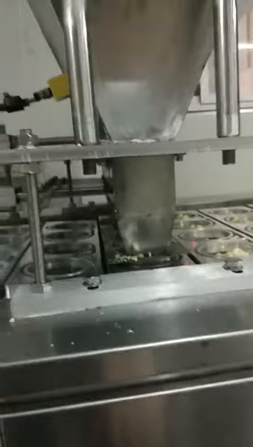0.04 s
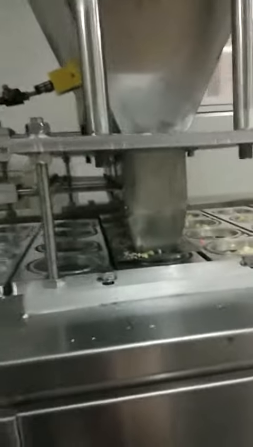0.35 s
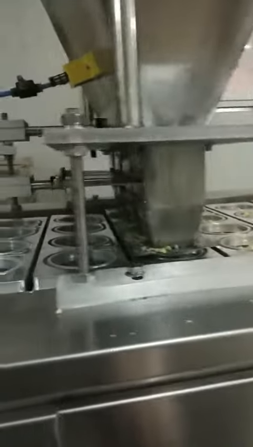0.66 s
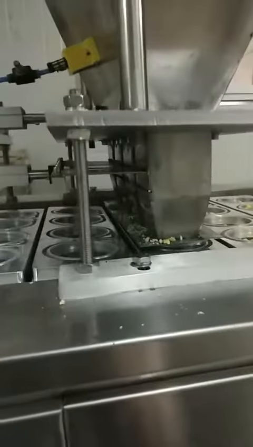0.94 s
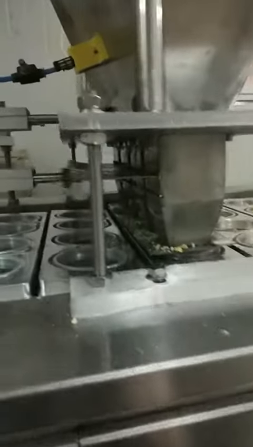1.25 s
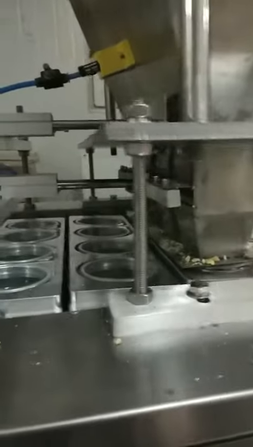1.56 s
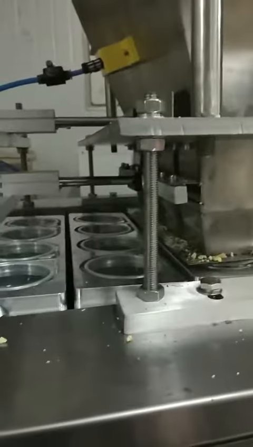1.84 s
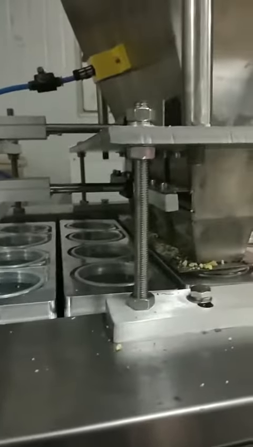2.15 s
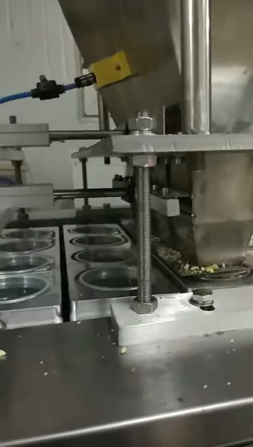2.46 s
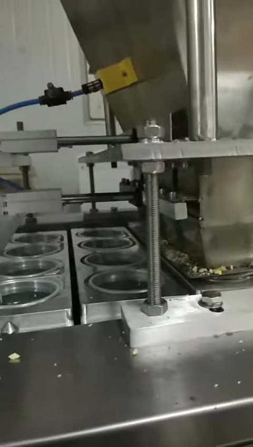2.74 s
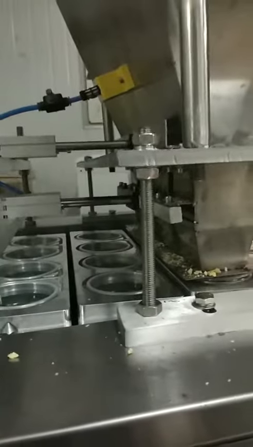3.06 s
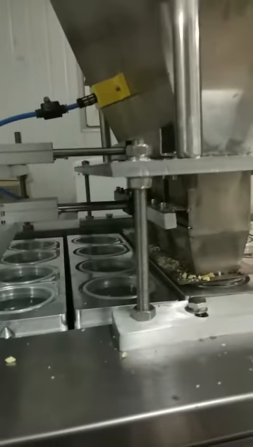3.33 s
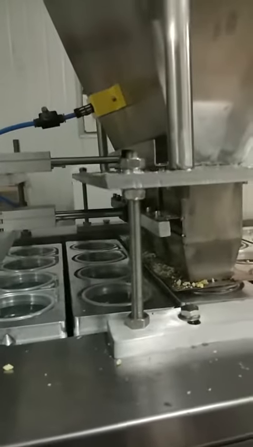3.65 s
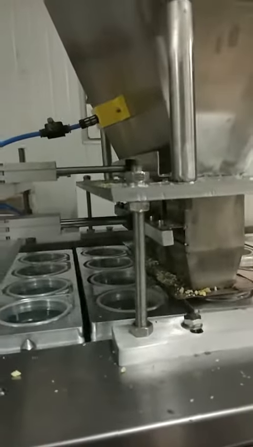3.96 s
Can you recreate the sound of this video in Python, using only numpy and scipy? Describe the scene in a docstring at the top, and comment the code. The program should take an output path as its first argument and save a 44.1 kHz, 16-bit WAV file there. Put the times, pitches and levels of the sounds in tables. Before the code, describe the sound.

A vibrating factory machine clunks to a stop, then air squeaks and hisses over machine noise.

```python
"""The vibrating steel hopper of a cup filling machine drones and rattles close by, with food fizzing inside.
It stops: a valve lets out air, a cylinder clanks against its stop and the dosing gate clunks. Slides
swish, air squeaks and hisses out of the cylinders, and the hopper begins to shake again.
Behind it all, a room full of machines roars and hums."""
import sys
import numpy as np
from scipy import signal
from scipy.fft import rfft, irfft
from scipy.io import wavfile
from scipy.ndimage import uniform_filter1d

SR = 44100
rng = np.random.default_rng(int(sys.argv[2]) if len(sys.argv) > 2 else 0)


def dump(signal):
    """Clip the signal to [-1, 1] and save it as 16-bit WAV at the path in sys.argv[1]."""
    limited = np.clip(np.atleast_2d(signal).T, -1, 1)
    pcm = np.round(limited * 32767).astype(np.int16)
    wavfile.write(sys.argv[1], SR, pcm)


N = 176400
TIME = np.arange(N) / SR
HZ = np.fft.rfftfreq(N, 1 / SR)
TOP_HZ = 15780


def amp(db):
    """Turns decibels into a gain."""
    return 10 ** (np.asarray(db) / 20)


def unit(x):
    """Scales a signal to an average (rms) level of 1."""
    return x / np.sqrt(np.mean(x ** 2) + 1e-20)


def over_pitch(points):
    """Joins (f/Hz, value) points into a curve over all frequencies."""
    hz, value = np.transpose(points)
    return np.interp(np.log(HZ + 1), np.log(hz + 1), value)


def over_time(points):
    """Joins (t/s, value) points into a curve over all samples."""
    return np.interp(TIME, *np.transpose(points))


def pan(db):
    """Left and right gains, with the left louder by db."""
    return amp(np.array([[db], [-db]]) / 2)


def drift(hz):
    """A smooth random wobble, mostly slower than hz."""
    return unit(irfft(rfft(rng.standard_normal(N)) * np.exp(-(HZ / hz) ** 2), N))


def noise(spectrum):
    """Stereo noise with this tone shape: alike on both sides in the bass, leaning left in the treble."""
    # how alike the two sides are: f/Hz, likeness/0-1
    likeness = [(100, 1), (280, 0.8572), (600, 0.6919), (1100, 0), (3000, 0), (16000, 0.0108)]
    # how much louder the left is: f/Hz, level/dB
    balance = [(60, -3.5), (150, 1), (380, 0.5), (950, 1.5), (2380, 6), (5980, 4.5), (15000, 9)]
    left, other = rfft(rng.standard_normal((2, N)))
    same, lean = np.clip(over_pitch(likeness), -1, 1), amp(over_pitch(balance) / 2)
    right = same * left + np.sqrt(1 - same ** 2) * other
    x = irfft(np.array([left * lean, right / lean]) * amp(over_pitch(spectrum)), N)
    return x / x.mean(0).std()


def ring_body(x, spectrum):
    """Plays x through a body with this tone shape, which rings only after each push."""
    log_gain = np.log(amp(over_pitch(spectrum)))
    response = np.exp(np.conj(signal.hilbert(np.r_[log_gain, log_gain[-2:0:-1]])))
    return signal.fftconvolve(x, irfft(response[:len(HZ)], N)[:4096])[:N]


def resonate(x, hz, width_hz):
    """Keeps a narrow band around a pitch, which may glide."""
    turn = np.exp(2j * np.pi * np.cumsum(hz * np.ones(len(x))) / SR)
    decay = np.exp(-np.pi * width_hz / SR)
    return 2 * (turn * signal.lfilter([1 - decay], [1, -decay], x / turn)).real


def swells(rows):
    """Loudness of events that rise, then drop 60 dB in their fade time (a negative fade grows)."""
    power = 0
    for start, rise, fade, db in rows:
        onset = np.clip((TIME - start) / rise, 0, 1)
        power += (onset * amp(db - 60 * np.maximum(TIME - start - rise, 0) / fade)) ** 2
    return np.sqrt(power)


def echoes(x, fade_s):
    """Dense echoes, different on each side, that drop 60 dB in fade_s."""
    t = TIME[:SR // 2]
    tail = rng.standard_normal((2, len(t))) * amp(-60 * t / fade_s)
    return signal.fftconvolve(np.atleast_2d(x), tail / np.linalg.norm(tail[0]), axes=1)[:, :N]


def add(mix, start, sound):
    """Mixes a sound in, start seconds from the beginning."""
    part = mix[round(start * SR):][:len(sound)]
    part += sound[:len(part)]


def left_first(x, lag_s):
    """A sound that reaches the left side before the right."""
    return np.array([x, irfft(rfft(x) * np.exp(-2j * np.pi * HZ * lag_s), N)])


def sputter(x, db, hz, seconds):
    """Turbulence: patches of the sound, sized by hz and seconds, flare and sink at random."""
    spectra = signal.stft(x, nperseg=1024, noverlap=768)[2]
    patches = rng.standard_normal(spectra.shape[1:])
    for axis, width in enumerate([hz * 1024 / SR, seconds * SR / 256]):
        n = patches.shape[axis]
        blur = np.exp(-(2 * np.fft.rfftfreq(n) * width) ** 2)
        patches = irfft(rfft(patches, axis=axis) * np.expand_dims(blur, 1 - axis), n, axis=axis)
    return signal.istft(spectra * unit(amp(db * unit(patches))), nperseg=1024, noverlap=768)[1][:, :N]


def machine_room():
    """The other machines roar steadily, with a wavering motor hum."""
    # tone shape of the roar: f/Hz, level/dB
    roar_tone = [(25, -54.5), (95, -35), (125, -18), (170, -8), (235, -3.5), (300, -6), (380, -11.5),
                 (470, -10), (640, -12.5), (820, -13), (1050, -15.5), (1600, -16.5), (2200, -12),
                 (2700, -13), (3400, -22), (6400, -26.5), (10000, -27), (12500, -33.5), (16000, -37.5)]
    # motor notes: f/Hz, width/Hz, level/dB
    motor_notes = [(248.58, 14.31, -43), (329.97, 4.904, -51.5)]
    hum = 0
    for hz, width, db in motor_notes:
        band = resonate(rng.standard_normal(N), hz, width)
        hum += amp(db) * unit(resonate(band, hz, width))
    return noise(roar_tone) * amp(-33 + .5 * drift(34.76)) + hum


def slides():
    """Running slides swish smoothly and the carriage rumbles."""
    # slide and carriage moves: start/s, rise/s, fade/s, level/dB
    slide_moves = [(.69, 0.01442, 2.5, -26), (1.03, 0.25453, 0.0021, -29.5), (2.2, 0.15584, 0.9851, -30.5),
                   (2.41, 0.0509, 0.522, -33.5), (3.27, 0.1175, 5, -28.5), (3.86, 0.092, -6.5, -35)]
    carriage_moves = [(.64, 0.0359, 0.5496, -27), (1.0, 0.04534, 0.464, -32), (3.33, 0.15996, 1, -30)]
    # their tone shapes: f/Hz, level/dB
    swish_tone = [(60, -48.5), (200, -6), (350, -11), (800, -2), (1600, -5.5), (2300, -2), (3200, -8.5),
                  (5000, -9), (7500, -14), (10500, -11), (13000, -24), (16000, -21.5)]
    rumble_tone = [(60, -56), (150, -18), (220, 5.5), (340, 12.5), (450, 7.5), (700, -9.5), (2000, -38),
                   (16000, -70)]
    travel = uniform_filter1d(swells(slide_moves), round(0.1165 * SR))  # soft starts and stops
    return noise(swish_tone) * travel + noise(rumble_tone) * swells(carriage_moves)


def valves():
    """Valves tick and let out spitting puffs of air."""
    # puffs: start/s, rise/s, fade/s, level/dB
    vents = [(.631, .016, .5, -19), (.76, .1, 2, -38), (1.98, 0.01311, 2.6, -36.5),
             (2.26, 0.0734, 0.557, -34.5), (2.897, 0.01118, 1.72, -36.5)]
    # ticks: t/s, level/dB
    tick_times = [(2.344, -32.5), (2.711, -29.5), (2.901, -29.5), (2.914, -34)]
    # tone shape of both: f/Hz, level/dB
    spit_tone = [(200, -32), (2800, -15), (4800, -3), (5600, 3.5), (6400, -3), (7800, -1.5), (9400, 1.5),
                 (11600, -2), (12800, -9.5), (16000, -8)]
    spit = noise(spit_tone)
    puffs = swells(vents) * amp(1.2 * drift(64.4))
    ticks = swells([(start, .001, 0.01041, db) for start, db in tick_times])
    return sputter(spit * (puffs + ticks) * pan(db=0.5), db=2.2, hz=300.9, seconds=0.06098)


def squeak(start, length, hz, glide, db, overtone_db):
    """Air forced past a seal sings briefly; the wider the gap, the lower and hissier the note."""
    t, out = np.arange(0, length, 1 / SR), np.zeros(N)
    width_hz = 1400 * (6000 / hz) ** 1.6
    arch = np.sqrt(abs(np.sin(np.pi * t / length)))
    for harmonic, level_db in [(1, db), (2, overtone_db), (3, overtone_db - 10)]:
        if harmonic * hz < TOP_HZ:
            band = rng.standard_normal(N)[:len(t)]
            for _ in range(3):
                band = resonate(band, harmonic * (hz + glide * t), width_hz * np.sqrt(harmonic))
            add(out, start, amp(level_db) * unit(band) * arch)
    return out


def exhaust():
    """Air hisses and squeaks out of the cylinders and makes the air line ring."""
    # bursts of air: start/s, rise/s, fade/s, level/dB
    bursts = [(3.07, 0.1376, 0.861, -29), (3.615, 0.06165, 0.7444, -25.5), (3.70, 0.03152, 0.7976, -28.5),
              (3.878, 0.01555, 0.826, -22.5)]
    # their tone shape: f/Hz, level/dB
    hiss_tone = [(200, -28), (3100, -17), (3800, -3), (4500, 4), (5200, 2), (5900, -9), (6700, 6),
                 (9800, 3), (12000, 2), (13500, -1), (16000, -0.5)]
    # squeaking seals: start/s, length/s, f/Hz, glide/(Hz per s), level/dB, overtone level/dB
    seal_notes = [(2.958, 0.02784, 7291, 11999.5, -38, -50.5), (2.998, 0.03676, 6730, 5000, -31, -42),
                  (3.025, 0.05129, 7340, 2000, -26.5, -28.5), (3.07, .06, 6400, 3000, -30, -34),
                  (3.098, .08, 7100, -2000, -25.5, -30), (3.14, .08, 6700, -9000, -25, -24),
                  (3.18, 0.0701, 5700, -11000, -29, -24), (3.22, .1, 5000, -2000, -31, -24),
                  (3.366, 0.03478, 6810, 0, -32.5, -59.5), (3.58, .09, 5254, -1000, -32, -30),
                  (3.645, .09, 4900, -3000, -28, -24), (3.712, 0.0891, 4200, -3000, -31.5, -28),
                  (3.813, 0.062, 8228, -10000, -22.5, -31), (3.88, 0.06557, 4400, -8000, -26, -26.5),
                  (3.939, 0.04974, 4462, -1000, -29, -33)]
    # ringing notes of the air line: f/Hz, level/dB
    line_notes = [(4533, -10.5), (6290, 1), (6880, 7), (7345, 3), (7596, 5), (8272, 4), (10128, 3)]
    squeaks = sum(squeak(*row) for row in seal_notes)
    squeaks = (echoes(squeaks, fade_s=.003) + amp(-2) * echoes(squeaks, fade_s=.16)) * pan(db=5)
    hiss = noise(hiss_tone) * swells(bursts) * amp(.9 * drift(67.8))
    jet = amp(-3.5) * squeaks + hiss
    ringing = [sum(amp(db) * resonate(side, hz, width_hz=45.64) for hz, db in line_notes) for side in jet]
    return amp(-1) * sputter(jet + np.array(ringing), db=4.5, hz=195.97, seconds=0.05502)


def steel_hit(notes, bright_db=0):
    """A struck steel part rings at its own notes, tuned a little differently on each hit."""
    t, out = TIME[:SR // 2], 0
    for hz, db, fade_s in notes:
        level = amp(db + bright_db * (hz > 700) - 60 * t / fade_s)
        out += level * np.cos(2 * np.pi * hz * rng.normal(1, 0.007794) * t)
    return out * np.minimum(t / 0.001243, 1)


def cylinder_and_gate():
    """The cylinder clanks on its stop, then the gate slams and bounces as its latch scrapes."""
    # cylinder hits: t/s, level/dB
    clanks = [(0.7138, 3.5), (0.72, 1), (.729, -0.5), (0.785, -6.5), (.826, -12.5)]
    # gate hits: t/s, level/dB, boost above 700 Hz/dB
    clunks = [(.9795, -11, 19.5), (.9835, -8, 18), (0.9908, -3, -2), (1.0, 4, -0.5), (1.023, -3.5, -11.5),
              (1.043, -12, 6)]
    # ringing notes of each part: f/Hz, level/dB, fade/s
    stop_notes = [(875.04, -29.5, 0.1866), (1012.7, -23.5, 0.1386), (1062.9, -28.5, 0.1157),
                  (1321.9, -28, 0.2), (1426.5, -27.5, 0.2225)]
    gate_notes = [(200.1, -28, 0.3453), (354.7, -23.5, 0.0772), (539.34, -25.5, 0.08765),
                  (575.47, -13.5, 0.04904), (748.16, -51, 0.0503), (899.7, -18.5, 0.0479),
                  (1093.1, -24.5, 0.04008), (1295.2, -35, 0.1118)]
    # latch scrape: start/s, rise/s, fade/s, level/dB
    latch = [(0.979, 0.004877, 0.06446, -20)]
    # tone shape of the cylinder's crack and the scrape: f/Hz, level/dB
    crack_tone = [(200, -20), (700, 7), (1150, 6), (1700, -2.5), (2300, 4.5), (3600, 1.5), (4400, -3),
                  (4950, 2.5), (5700, -5), (11000, -4), (13000, -12), (16000, -17.5)]
    stop, gate = np.zeros((2, N))
    for start, db in clanks:
        add(stop, start, amp(db) * steel_hit(stop_notes))
    for start, db, bright_db in clunks:
        add(gate, start, amp(db) * steel_hit(gate_notes, bright_db))
    cracks = noise(crack_tone) * swells([(start, .001, 0.1094, db - 19.5) for start, db in clanks] + latch)
    hits = (echoes(stop, fade_s=0.00615) + gate) * pan(db=-1.5) + cracks * pan(db=-4)
    hits = signal.sosfilt(signal.butter(2, 256.4, "high", fs=SR, output="sos"), hits)
    return hits + amp(-5.5) * echoes(hits, fade_s=0.7608)


def food_fizz(cycles):
    """Food in the hopper fizzes, pulsing with each shake, then dies away."""
    # tone shape of the fizz: f/Hz, level/dB
    fizz_tone = [(200, -25.5), (700, 5), (1350, -1), (1750, -5), (2400, -5), (3200, -6), (4700, -7),
                 (7500, -12.5), (10500, -10.5), (13000, -17.5), (16000, -19.5)]
    end_s, fade_s = 0.63872, 0.3275
    pulse = unit(1 + 0.1615 * np.exp(-(cycles % 1) / 0.2774))
    fade_db = 60 * np.maximum(TIME - end_s, 0) / fade_s
    return noise(fizz_tone) * pulse * amp(-29 + drift(24.2) - fade_db)


def hopper():
    """One blow per shake makes the hopper drone; working loose, it knocks, rasps and rings its frame."""
    # strength of the shaking, and of the loose rattle within it: t/s, level/dB
    shaking = [(0, 1.5), (.13, -0.5), (.24, -2.5), (.31, -3.5), (.41, -1), (.49, -2.5), (.62, -5.5),
               (.655, -4.5), (.672, -16.5), (.76, -21), (.85, -51.5), (3.86, -76), (3.93, -21.5),
               (3.97, -18), (4, -21)]
    looseness = [(0, -9.5), (.1, -2), (.3, 3.5), (.5, 4), (.65, 8), (4, 7)]
    # tone shapes of the hopper and of its taps on the frame: f/Hz, level/dB
    steel_tone = [(40, -73.5), (95, -80.5), (140, -99), (187, -15), (281, -11), (375, -11), (430, -3),
                  (469, 1.5), (562, -5), (656, -12), (760, -28.5), (1000, -55), (1320, -21), (1700, -70.5),
                  (4000, -45.5), (16000, -58.5)]
    rasp_tone = [(100, -52.5), (620, 5), (800, -11), (1350, -12), (2200, -21), (16000, -46.5)]
    # notes of the loose frame, beating against the drone: f/Hz, level/dB
    frame_notes = [(302, -37.5), (346, -38), (397, -32), (489.6, -26), (533, -32), (635.3, -31.5)]
    shake_hz, jitter_s, tap_lag_s, knocks_per_s = 93.556, 0.00015185, .003, 130
    cycles = np.cumsum(shake_hz * (1 + 0.0012 * drift(3.6616))) / SR
    beats = np.flatnonzero(np.diff(np.floor(cycles), prepend=-1))  # first sample of each shake
    slip, blow_size, tap_size = rng.standard_normal((len(beats), 3)).T
    blow_at = np.clip(beats + (slip * jitter_s * SR).astype(int), 0, N - 1)
    blows = np.bincount(blow_at, 1 + 0.05083 * blow_size, N)
    taps = np.bincount(beats + round(tap_lag_s * SR), tap_size, N)[:N]
    knocks = (rng.random(N) < knocks_per_s / SR) * rng.choice([-1, 1], N)
    frame = sum(amp(db + 2 * drift(6.31)) * np.sin(2 * np.pi * (hz * TIME + rng.random()))
                for hz, db in frame_notes)
    drone = amp(-12.5) * unit(ring_body(blows, steel_tone))
    knocking = amp(-27.5) * unit(ring_body(knocks, steel_tone))
    rasp = amp(-33) * unit(ring_body(taps, rasp_tone))
    rattle = (frame + knocking + rasp) * amp(over_time(looseness))
    body = (drone + rattle) * amp(over_time(shaking))
    direct = left_first(body, lag_s=0.0001598) * pan(db=-2)
    return direct + food_fizz(cycles) + amp(-20) * echoes(body, fade_s=.45)


def scene():
    """Everything together; the room's roar and the slides flutter slightly."""
    shaking_hopper = hopper()
    background = sputter(machine_room() + slides(), db=1.5, hz=217.7, seconds=0.08254)
    return background + valves() + exhaust() + cylinder_and_gate() + shaking_hopper


def record(dry):
    """Cuts away the treble above TOP_HZ."""
    low_pass = signal.firwin(601, TOP_HZ, window=("kaiser", 9), fs=SR)
    return signal.oaconvolve(dry, low_pass[None], "same")


dry = scene()
out = record(dry)
dump(out)
```